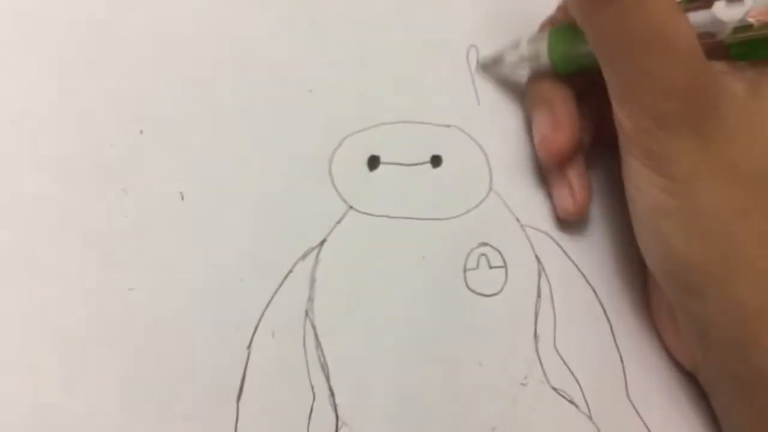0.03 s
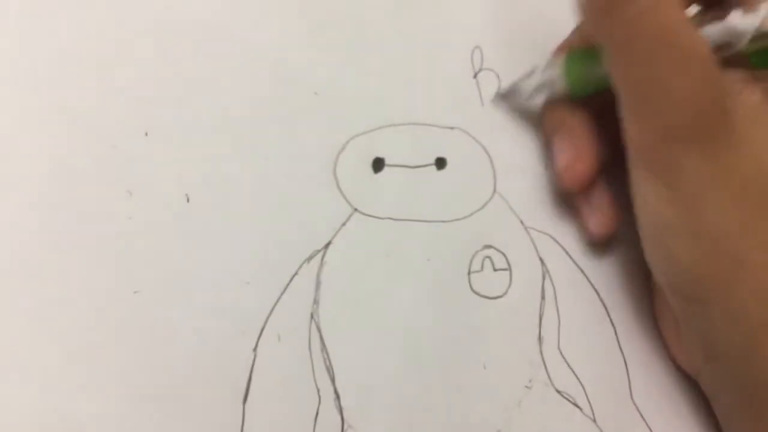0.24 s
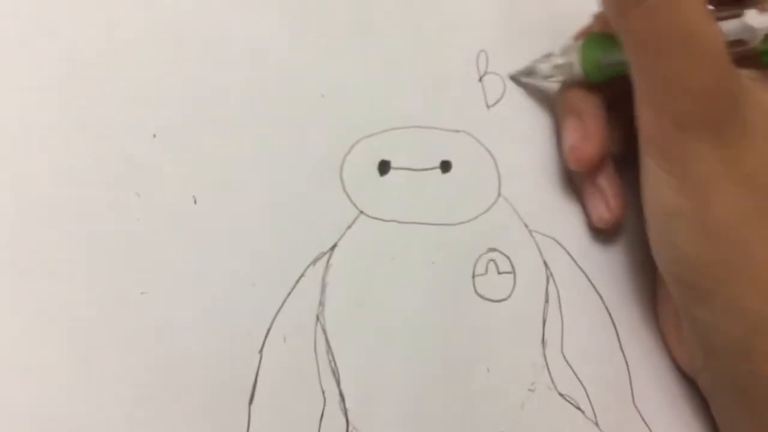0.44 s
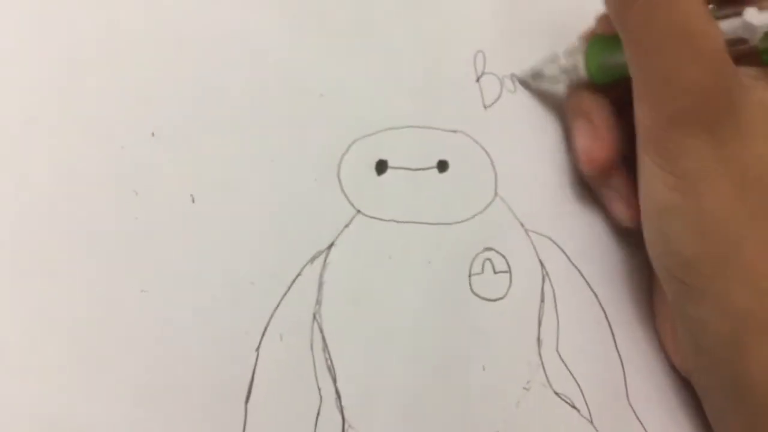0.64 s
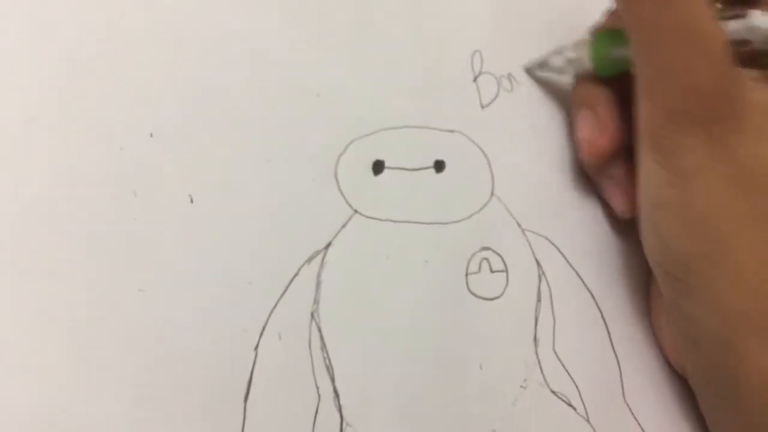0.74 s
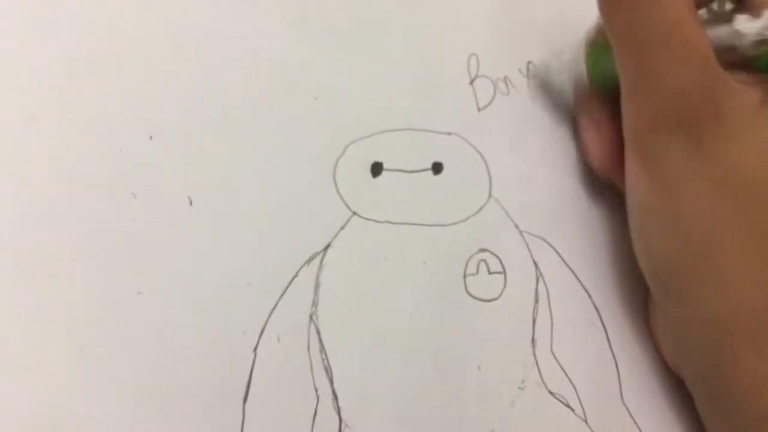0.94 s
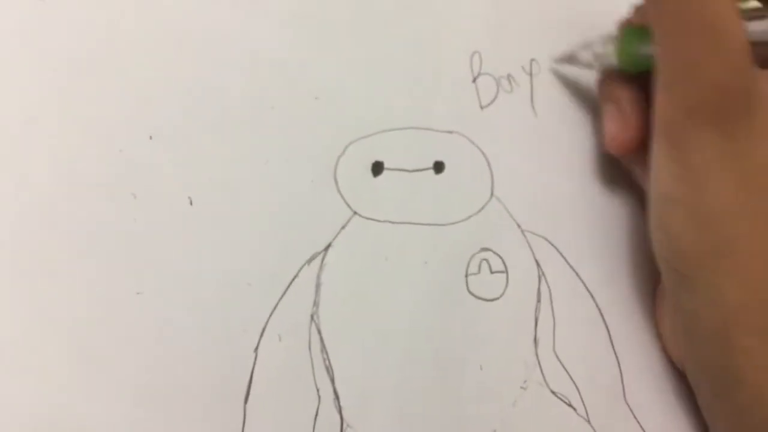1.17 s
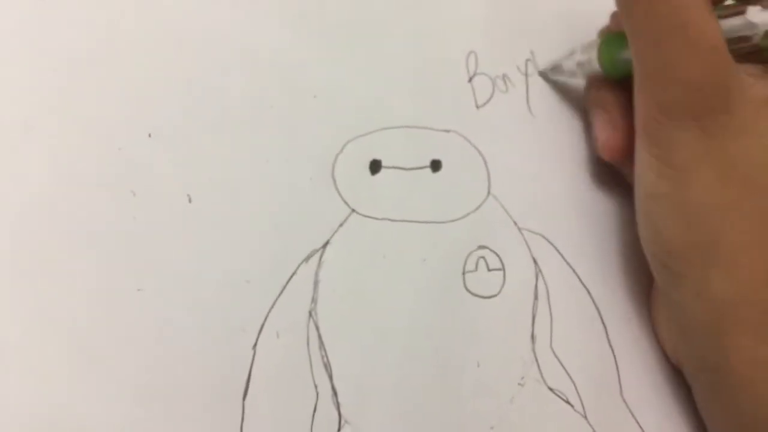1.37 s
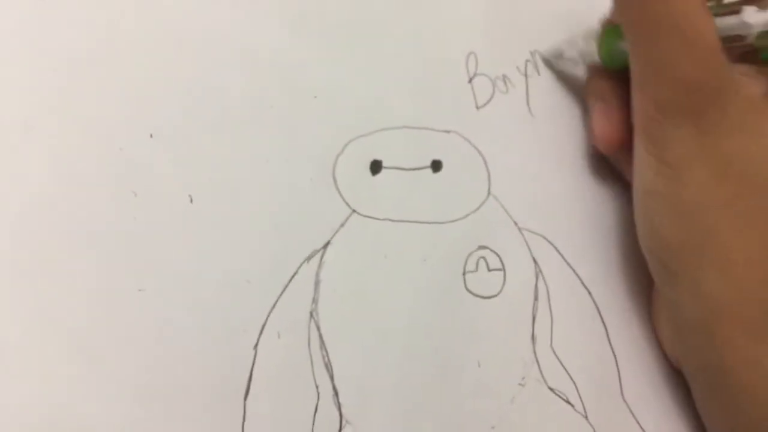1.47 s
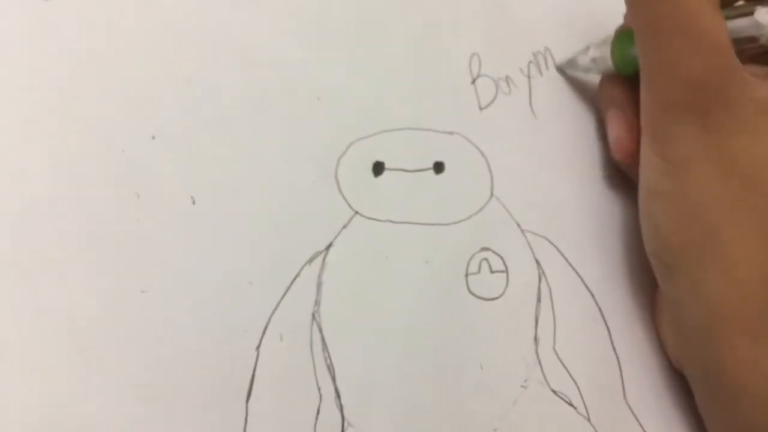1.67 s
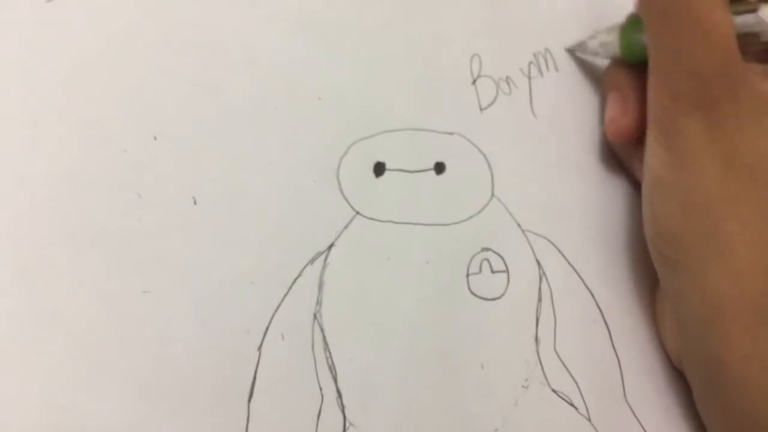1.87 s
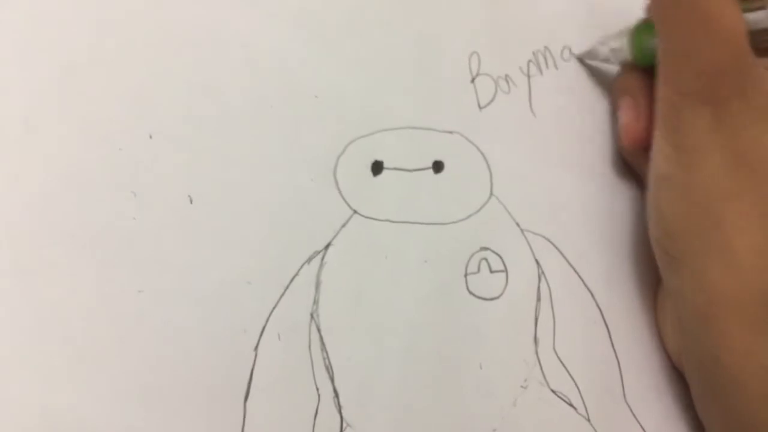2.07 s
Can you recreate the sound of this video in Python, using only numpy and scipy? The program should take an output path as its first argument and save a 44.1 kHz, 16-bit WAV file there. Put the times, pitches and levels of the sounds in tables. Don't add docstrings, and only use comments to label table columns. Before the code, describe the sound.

A pencil writes on paper on a hollow desk: a hand first brushes the sheet, then short gritty scratches mix with small ticks and woody knocks, close to the microphone in a quiet, faintly humming room.

```python
import sys
import numpy as np
from scipy import signal
from scipy.fft import rfft, irfft, next_fast_len
from scipy.io import wavfile
from scipy.ndimage import uniform_filter1d

SR = 44100
rng = np.random.default_rng(int(sys.argv[2]) if len(sys.argv) > 2 else 0)


def makeup_ratio(level_db):
    decades = np.asarray(level_db, float) / 20
    return 10 ** decades


def dump_mix(stems):
    frames = np.atleast_2d(stems).T
    limited = np.clip(frames, -1, 1)
    pcm = np.round(limited * 32767).astype(np.int16)
    wavfile.write(sys.argv[1], SR, pcm)


N = 92962
PATCHY_DB = 4.5


def evened(x):
    return x / np.sqrt(np.mean(x ** 2) + 1e-20)


def smoothed(x, bins, frames):
    return uniform_filter1d(uniform_filter1d(x, size=bins, axis=0), size=frames, axis=1)


def coloured(x, points, tilt_db=0):
    size = next_fast_len(len(x) + 512)
    hz = np.fft.rfftfreq(size, 1 / SR) + 1
    f, db = np.transpose(points)
    gain_db = np.interp(np.log(hz), np.log(f), db) + tilt_db * np.log2(hz / 6e3)
    return irfft(rfft(x, size) * makeup_ratio(gain_db), size)[:len(x)]


def resonate(x, hz, width_hz):
    r = np.exp(-np.pi * width_hz / SR)
    return 2 * signal.lfilter([1 - r], [1, -r * np.exp(2j * np.pi * hz / SR)], x).real


def resonate_twice(x, hz, width_hz):
    return resonate(resonate(x, hz, width_hz), hz, 2 * width_hz)


def ring(modes):
    t = np.arange(SR // 3) / SR
    return sum(makeup_ratio(db - 60 * t / t60) * np.sin(2 * np.pi * hz * t) for hz, db, t60 in modes)


def arch(start, length, rise, fall):
    u = (np.arange(N) / SR - start) / length
    return np.sin(np.pi / 2 * np.clip(np.minimum(u / rise, (1 - u) / fall), 0, 1)) ** 2


def patchy(x, depth_db):
    z = signal.stft(x, nperseg=512, noverlap=384)[2]
    patches = evened(smoothed(rng.standard_normal(z.shape), 2, 18))
    return signal.istft(z * makeup_ratio(depth_db * patches), nperseg=512, noverlap=384)[1][:N]


def grit():
    clicks_per_s, spread_db = 6600, 4.5
    size = makeup_ratio(spread_db * np.minimum(rng.exponential(1, N), 2.5))
    return evened(size * rng.choice([-1, 1], N) * (rng.random(N) < clicks_per_s / SR))


# start t/s, length t/s, scratch level/dB,
# brightness/(dB per octave), squeak level/dB
PEN_STROKES = [(0.181, 0.076, -71.5, 6, 0), (0.229, 0.13, -72.5, 7, -11), (0.303, 0.1, -78, 4.5, 0),
               (0.473, 0.08, -80, 7.5, 1.5), (0.531, 0.13, -75, 7, -3), (0.622, 0.081, -71.5, 5.5, -17),
               (0.694, 0.052, -71.5, 7, -23), (0.737, 0.039, -77.5, 4, -13), (0.849, 0.12, -78.5, 8.5, 0),
               (0.941, 0.073, -78, 5.5, 2), (0.993, 0.074, -69, 4, 6.5), (1.032, 0.06, -76.5, 1.5, 11),
               (1.285, 0.059, -72.5, 0.5, -4), (1.335, 0.095, -77.5, 7, -3), (1.437, 0.09, -72, 6.5, 8.5),
               (1.519, 0.084, -76.5, 9, -8), (1.617, 0.08, -73.5, 6, 8.5), (1.685, 0.1, -76, 5, -1),
               (1.793, 0.012, -79.5, 4.5, -13), (1.91, 0.05, -76.5, 0.5, 3), (1.94, 0.076, -73, 10, -2),
               (1.998, 0.084, -80.5, 4, -4), (2.058, 0.045, -76.5, 10, 2.5)]
# f/Hz, width f/Hz, level/dB
SCRATCH_RESONANCES = [(2033, 630, 10.5), (3364, 880, 1), (4660, 470, 3), (6320, 2400, -5.5),
                      (7290, 330, 5.5), (8090, 1070, -4.5), (11500, 1800, -15), (15500, 2400, -13)]


def strokes():
    rough, out = grit(), np.zeros(N)
    hiss = np.zeros(N)
    for k, (hz, width_hz, db) in enumerate(SCRATCH_RESONANCES):
        hiss += (-1) ** k * makeup_ratio(db) * resonate_twice(rough, hz, width_hz)
    squeak = evened(resonate_twice(rough, 11900, 1000))
    flat = [(1, 0), (2e4, 0.0053)]
    for start, length, db, tilt_db, squeak_db in PEN_STROKES:
        tone = evened(coloured(evened(hiss), flat, tilt_db)) + makeup_ratio(squeak_db - 13) * squeak
        out += makeup_ratio(db) * arch(start, length, 0.25, 0.45) * tone
    return patchy(out, PATCHY_DB)


# f/Hz, level/dB, t60 t/s
BARREL_MODES = [(722, -13, 0.093), (1023, 1, 0.024), (1191, 0, 0.014), (1456, -17, 0.075),
                (1972, -10.5, 0.026), (2282, -11.5, 0.029), (2880, -47, 0.068), (3025, -22.5, 0.033),
                (3780, -37, 0.036), (4830, -23, 0.02)]


def barrel_ring():
    return ring(BARREL_MODES)


DESK_MODES_HZ = [49.6, 130.9, 177.5, 209.9, 258.4, 315.8, 367.1, 419.1, 469.5, 517.7, 587.7]
# level/dB, t60 t/s
DESK_MODES_DECAY = [(-21, 0.78), (-5.5, 0.19), (1.5, 0.076), (-4, 0.12), (-0.5, 0.079), (-1, 0.072),
                    (3, 0.1), (-11, 0.12), (-11.5, 0.18), (-9.5, 0.054), (-9, 0.15)]


def desk_ring():
    return ring([(hz, *mode) for hz, mode in zip(DESK_MODES_HZ, DESK_MODES_DECAY)])


def desk():
    hollow_hz = 302.7
    x = resonate(resonate(desk_ring(), hollow_hz, 210), hollow_hz, 400)
    return x / abs(x).max()


# start t/s, length t/s,
# level/dB, favoured desk pitch f/Hz, barrel share level/dB
LEAD_DRAGS = [(0.191, 0.081, -49.5, 213, 1.5), (0.259, 0.06, -55.5, 221, 2.5),
              (0.307, 0.027, -45.5, 284, -4), (0.319, 0.067, -59, 213, 11), (0.478, 0.068, -54.5, 203, -2),
              (0.537, 0.13, -61.5, 212, 2), (0.54, 0.094, -64, 59, -25), (0.692, 0.059, -72, 69, -28),
              (0.625, 0.067, -56.5, 270, 11.5), (0.679, 0.1, -64, 283, 9), (0.85, 0.05, -51, 257, -3.5),
              (0.889, 0.075, -58, 275, -7), (0.95, 0.044, -54.5, 292, 10.5),
              (0.988, 0.092, -50.5, 342, 11.5), (1.017, 0.078, -51, 226, 1), (1.076, 0.071, -68, 281, -15),
              (1.132, 0.088, -75, 262, -9), (1.327, 0.074, -56, 178, 3.5), (1.417, 0.13, -59.5, 300, 7.5),
              (1.539, 0.051, -61, 230, -5), (1.642, 0.055, -61, 297, 2), (1.679, 0.11, -59.5, 202, 3.5),
              (1.795, 0.036, -88.5, 60.4, -27), (1.938, 0.082, -62, 285, -1),
              (2.027, 0.1, -69.5, 277, 12.5)]


def drags():
    judder_db, barrel_rub_db, desk_width_hz = 0.5, -22.5, 92.3
    rise, fall = 0.23, 0.47
    judder = evened(uniform_filter1d(uniform_filter1d(rng.standard_normal(N), 300), 300))
    rough = rng.standard_normal(N) * makeup_ratio(judder_db * judder)
    low, high = np.zeros(N), np.zeros(N)
    for start, length, db, hz, barrel_db in LEAD_DRAGS:
        force = makeup_ratio(db) * arch(start, length, rise, fall) * rough
        low += 3 * resonate_twice(force, hz, desk_width_hz)
        high += makeup_ratio(barrel_db + barrel_rub_db) * force * arch(start, length, 2 * rise, fall)
    body, barrel = desk_ring(), barrel_ring()
    in_desk = signal.oaconvolve(low, body / np.linalg.norm(body))
    in_barrel = signal.oaconvolve(high, barrel / np.linalg.norm(barrel))
    return (in_desk + in_barrel)[:N]


# t/s, knock level/dB, hardness level/dB
TIP_KNOCKS = [(0.2282, -40.5, -7), (0.262, -42, -2), (0.319, -54, -12), (0.321, -48.5, 8),
              (0.353, -44.5, -7), (0.486, -40, -4), (.641, -46.5, 9), (0.661, -44, 6), (0.733, -48, -6),
              (0.831, -26, 4), (0.973, -38, 11.5), (1.02, -42, 17), (1.038, -57, 14), (1.193, -68, -15),
              (1.3027, -22.5, 4), (1.443, -42, 13.5), (1.541, -61, 20.5), (1.563, -50, -9),
              (1.618, -39, 15.5), (1.664, -44.5, -5), (1.725, -48, 9), (1.9126, -26, 5.5)]


def knocks():
    travel_s, blow_s = 0.00231, 0.0015
    sway_hz, sway_db, sway_peak_s = 63.2, -26.5, 0.019
    rattle_db, rattle_s, barrel_db = -13.5, 0.038, -24
    soft, hard, t = np.zeros(N), np.zeros(N), np.arange(SR // 3) / SR
    for s, db, hard_db in TIP_KNOCKS:
        at = round((s + travel_s) * SR)
        soft[at] = makeup_ratio(db)
        hard[at - 30] = makeup_ratio(db + hard_db + barrel_db)
    blow = np.sin(np.pi * np.clip(t[:300] / blow_s, 0, 1))
    swell = (t / sway_peak_s * np.exp(1 - t / sway_peak_s)) ** 2
    sway = makeup_ratio(sway_db) * swell * np.sin(2 * np.pi * sway_hz * t)
    thud = np.convolve(desk(), blow / blow.sum())[:len(t)] + sway
    rattle = signal.oaconvolve(hard, np.exp(-t / rattle_s))[:N]
    chatter = rattle * rng.standard_normal(N) * makeup_ratio(rattle_db - 24)
    barrel = barrel_ring() * np.minimum(t / 0.0013, 1)
    return signal.oaconvolve(soft, thud)[:N] - signal.oaconvolve(hard + chatter, barrel)[:N]


# t/s, level/dB, brightness/(dB per octave), length t/s
LEAD_TICKS = [(0.471, -52, 4, 0.00071), (0.564, -73, 4, .001), (0.707, -64, 5, .001),
              (0.74, -46.5, -7, 0.002), (0.7506, -40.5, -4, 0.0015), (0.754, -57, -2, 0.003),
              (0.822, -54, 3, 0.0018), (0.831, -61, 3, 0.0045), (0.869, -62.5, 1, .001),
              (0.878, -66, 0, 0.00089), (1.015, -61, 2, .002), (1.0945, -66, 0, .0006),
              (1.113, -51, 17, 0.00068), (1.1135, -50, -7, 0.0035), (1.115, -52, 14, .0006),
              (1.154, -62, 5, 0.0006), (1.172, -57, 12, .0006), (1.197, -54.5, 9, 0.0021),
              (1.2, -61, -21, 0.0014), (1.205, -76, -4, 0.00069), (1.295, -41.5, 10.5, 0.0005),
              (1.309, -48.5, 1, 0.0012), (1.62, -60, -6.5, 0.0016), (1.71, -54, -6, 0.00072),
              (1.802, -70, -2, 0.0012), (1.823, -63, 14, 0.00063), (1.841, -56.5, 9.5, 0.00083),
              (1.9012, -50, 3, 0.0013), (1.91, -55, -1.5, 0.002), (1.918, -60, 3, 0.0027),
              (1.964, -62, -2, 0.0014)]
# f/Hz, level/dB
TICK_COLOUR = [(1400, -32.5), (2330, -5), (2900, -21), (3600, -2), (5000, -4.5), (5600, -2.5), (9800, -5.5),
               (15300, -9)]


def ticks():
    out, t = np.zeros(N + 2000), np.arange(-100, 1900) / SR
    for s, db, tilt_db, length in LEAD_TICKS:
        decay_s = max(length, 3e-4)
        shape = np.exp(-np.maximum(t / decay_s, -2 * t / decay_s))
        crackle = evened(coloured(rng.standard_normal(2000), TICK_COLOUR, tilt_db))
        at = round(s * SR) - 100
        out[at:at + 2000] += makeup_ratio(db - 8) * shape * crackle
    return out[:N]


# t/s, level/dB, lower f/Hz, upper f/Hz, width f/Hz
SHEET_SNAP = (2.1035, -50.5, 2878, 4392, 376)


def snap():
    s, db, low_hz, high_hz, width_hz = SHEET_SNAP
    burst = rng.standard_normal(N) * arch(s, 0.006, 0.3, 0.5)
    low = resonate(resonate(burst, low_hz, width_hz), low_hz, width_hz)
    high = resonate(resonate(burst, high_hz, width_hz), high_hz, width_hz)
    both = low + makeup_ratio(-5) * high
    return makeup_ratio(db) * both / abs(both).max()


# f/Hz, level/dB
HAND_HISS = [(410, -34), (700, -13), (1890, -7), (2290, -2), (3290, -7.5), (4660, 0.5), (7710, -5.5),
             (9480, -1.5), (15300, -11.5)]
# f/Hz, level/dB
HAND_RUMBLE = [(35, -22), (85, 5), (200, -3.5), (350, -4.5), (620, -14.5), (1000, -44)]
# f/Hz, width f/Hz, level/dB
SHEET_RESONANCES = [(1190, 130, 7.5), (2250, 440, 5.5), (4800, 160, 6), (5540, 300, -0.5), (6060, 250, 5),
                    (6950, 270, 8.5), (8350, 190, 4), (9270, 120, 6.5), (10640, 230, -9.5),
                    (12200, 880, -2), (14500, 760, -3)]


def slide():
    hiss_db, rumble_db = -49.5, -54
    top_s, end_s, stop_s = 0.033, 0.178, 0.008
    tail_s, tail_hz, tail_db = 0.035, 5400, -1
    t = np.arange(N) / SR
    skin, weight = rng.standard_normal((2, N))
    sheet = sum(makeup_ratio(db) * resonate(skin, hz, width_hz) for hz, width_hz, db in SHEET_RESONANCES)
    hiss = evened(coloured(skin + sheet, HAND_HISS))
    rumble = evened(coloured(weight, HAND_RUMBLE))
    dull = coloured(hiss, [(tail_hz, 0), (2 * tail_hz, -14)])
    speed_db = np.interp(t, [0, top_s / 2, top_s, end_s], [-6, 0, 0, -6.5])
    after_s = np.maximum(t - end_s, 0)
    contact = np.exp(-after_s / stop_s)
    linger = makeup_ratio(tail_db) * (np.exp(-after_s / tail_s) - contact)
    hiss_level = makeup_ratio(hiss_db + speed_db)
    rumble_level = makeup_ratio(rumble_db + speed_db / 2)
    return hiss_level * linger * dull + contact * (hiss_level * hiss + rumble_level * rumble)


# f/Hz, level/dB
ROOM_COLOUR = [(20, -14), (107, 5), (400, -5), (560, -14), (937, -22), (2820, -21.5), (3600, -26),
               (4300, -30.5), (15300, -33.5)]
# f/Hz, width f/Hz, level/dB
ROOM_WHINES = [(2787, 53, -6), (3630, 58, -4)]


def room():
    air = rng.standard_normal(N)
    whines = sum(makeup_ratio(db) * resonate(air, hz, width_hz) for hz, width_hz, db in ROOM_WHINES)
    return makeup_ratio(-71.5) * evened(coloured(air + whines, ROOM_COLOUR))


def gated(x):
    edge_hz, gap_share, quiet_db = 15330, 1.75, 5
    hz, _, z = signal.stft(x, SR, nperseg=1024, noverlap=768)
    hz = hz[:, None]
    level_db = 10 * np.log10(smoothed(abs(z) ** 2, 24, 4) + 1e-20)
    over_db = level_db - np.percentile(level_db, 10, axis=1, keepdims=True)
    chance = evened(smoothed(rng.standard_normal(z.shape), 3, 22))
    top_lean = 1 + 4 * np.clip((hz - 13.5e3) / 1.5e3, 0, 1)
    lean = np.clip(1 - over_db / quiet_db, 0, 1) * top_lean
    muted = (chance + 0.6 * lean > gap_share) & (hz > 3e3) | (hz > edge_hz)
    return signal.istft(z * ~muted, SR, nperseg=1024, noverlap=768)[1][:N]


# start t/s, length t/s, level/dB, low f/Hz, high f/Hz
CHANNEL_SPLIT = (.027, .047, -66, 4100, 5300)


def split():
    start, length, db, low_hz, high_hz = CHANNEL_SPLIT
    band_pass = signal.butter(6, [low_hz, high_hz], "band", fs=SR, output="sos")
    band = evened(signal.sosfilt(band_pass, rng.standard_normal(N)))
    return np.outer([1, -1], makeup_ratio(db) * band * arch(start, length, 0.3, 0.3))


def scene():
    pencil = strokes() + drags() + knocks() + ticks()
    hand = patchy(slide(), 2)
    return np.tile(pencil + snap() + hand + patchy(room(), PATCHY_DB), (2, 1))


def top_cut(x):
    return signal.sosfilt(signal.butter(12, 15420, fs=SR, output="sos"), x)


def record(dry):
    bass_cut = signal.butter(2, 35, "high", fs=SR, output="sos")
    mix = gated(signal.sosfilt(bass_cut, dry[0])) + split()
    return top_cut(mix)


dry = scene()
out = record(dry)
dump_mix(out)
```